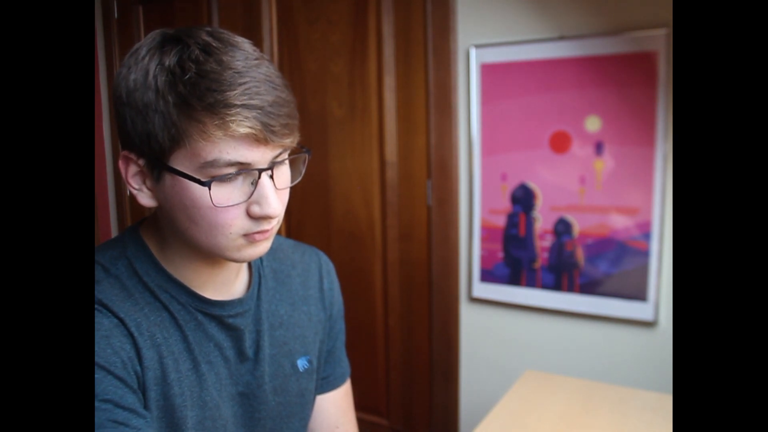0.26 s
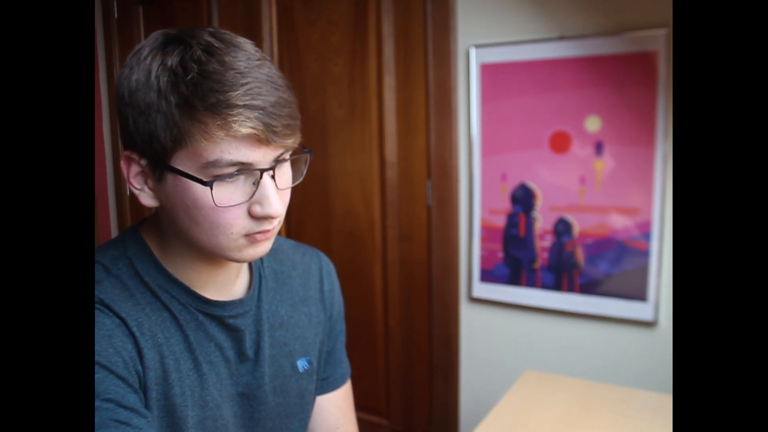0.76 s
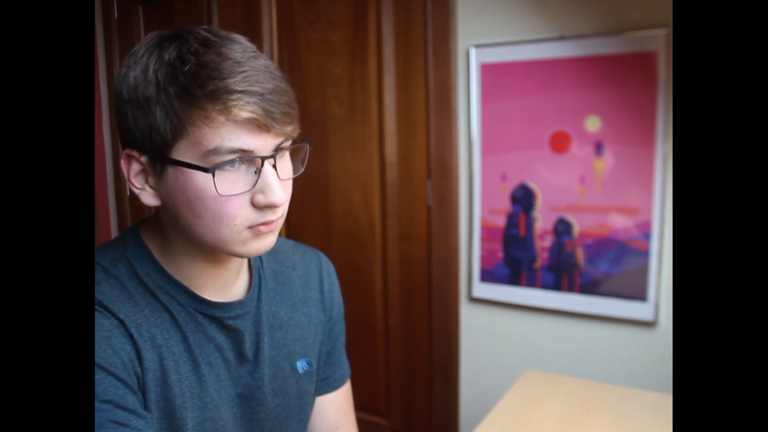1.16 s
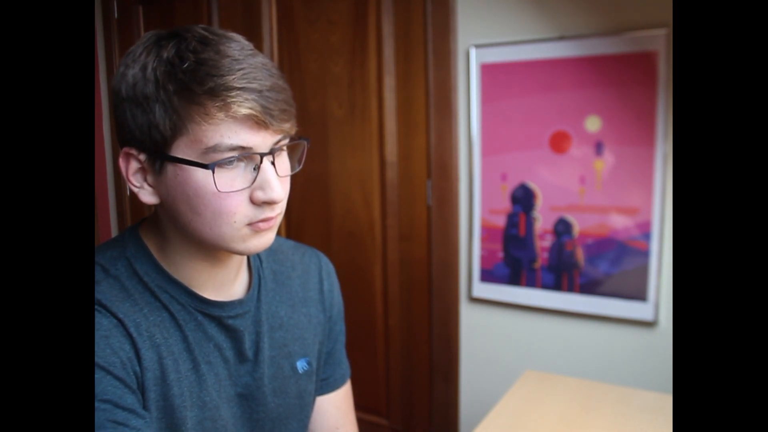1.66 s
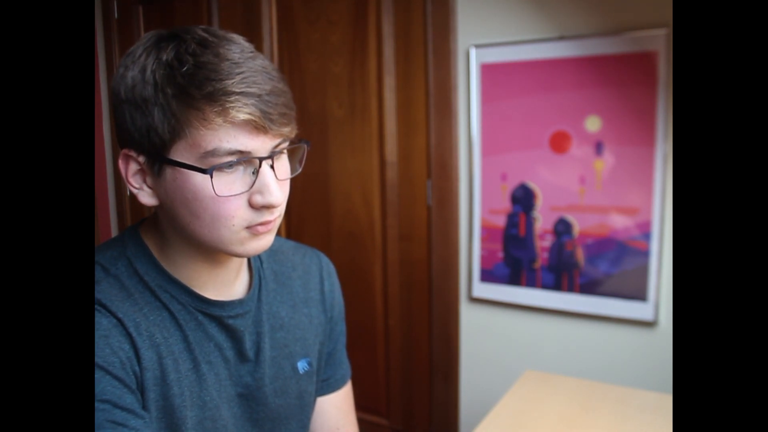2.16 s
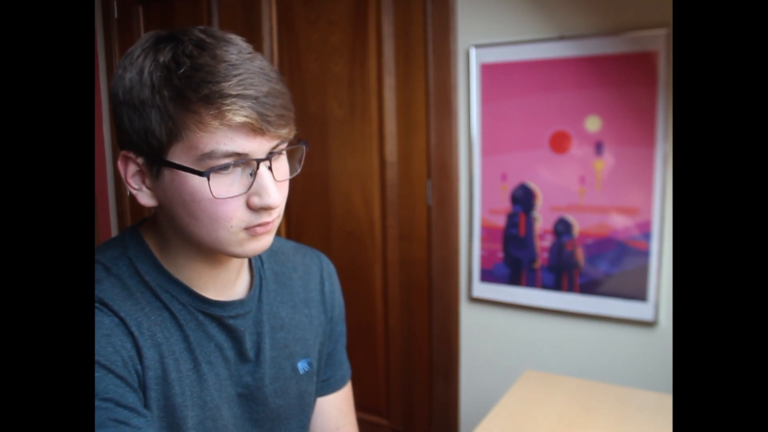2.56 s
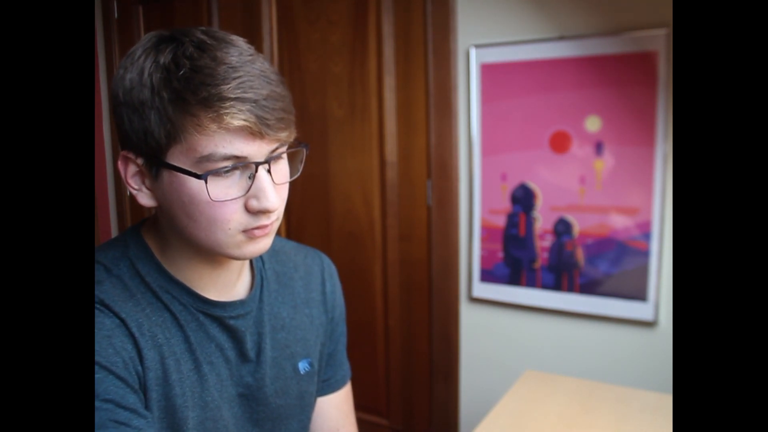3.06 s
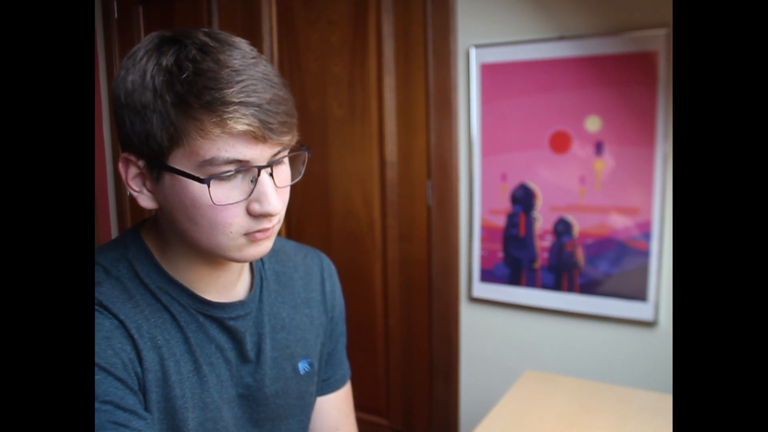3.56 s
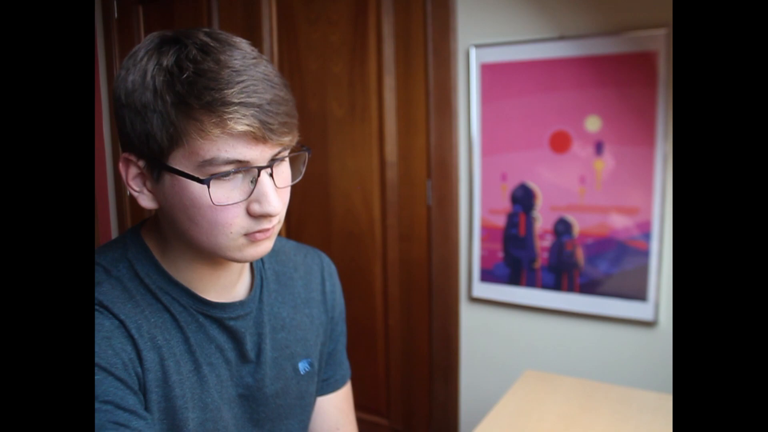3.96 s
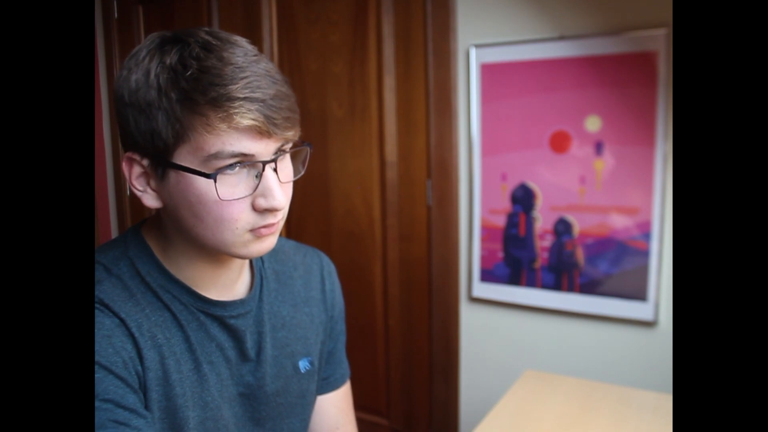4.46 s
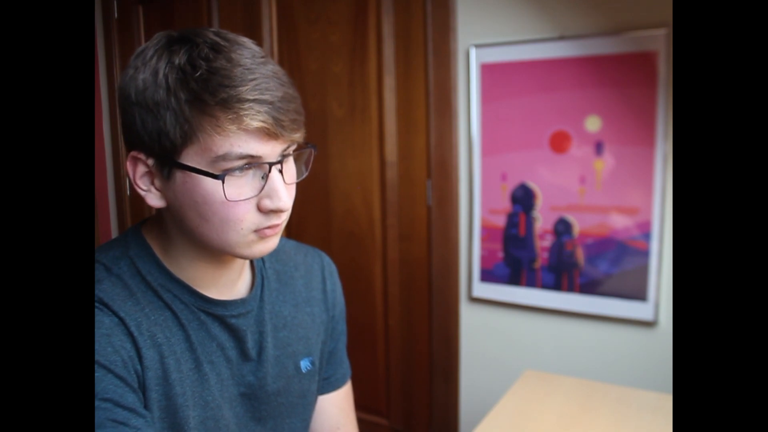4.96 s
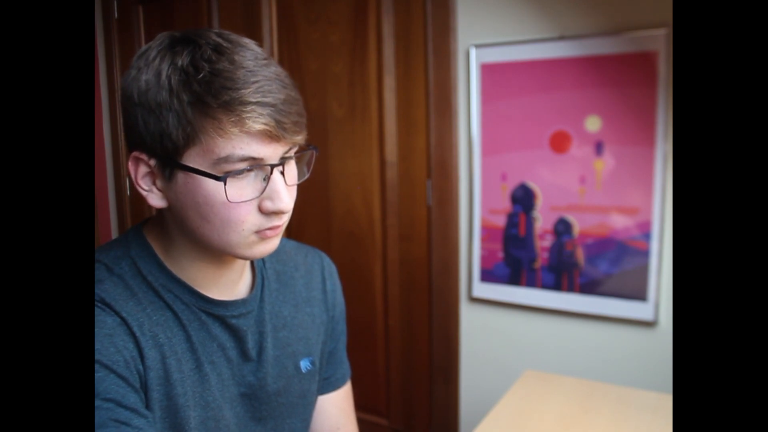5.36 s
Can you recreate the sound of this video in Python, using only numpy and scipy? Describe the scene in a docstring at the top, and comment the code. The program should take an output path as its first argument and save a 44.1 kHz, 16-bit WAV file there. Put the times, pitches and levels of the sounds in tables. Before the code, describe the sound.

In a small, quiet room with faint rumble and hiss, a hand works a computer mouse on a wooden desk. Six sharp, plastic double ticks come at a slow, slightly uneven pace, mixed with very soft sliding. Dull knocks on the desk boom up the microphone stand throughout, the hardest just after the fifth click. Shortly after the last click, the sound cuts off.

```python
"""A computer mouse is clicked six times on a wooden desk in a small, quiet room.
Each press and release snaps the switch, which rings its spring and rattles the plastic shell.
The mouse rubs softly over the desk; hand and mouse bump the wood, whose boom travels up the
microphone stand. Under it lie room rumble, hiss and a thin whine, until the sound is switched off."""
import sys
import numpy as np
from scipy import signal
from scipy.fft import rfft, irfft
from scipy.io import wavfile

SR = 44100
rng = np.random.default_rng(int(sys.argv[2]) if len(sys.argv) > 2 else 0)


def materialize(psi):
    """Save the field psi as 16-bit PCM at rate SR to the path in sys.argv[1].

    A 1-D psi becomes a single channel; in a 2-D psi each row is a channel.
    """
    bounded = np.clip(np.atleast_2d(psi).T, -1, 1)
    quanta = np.round(bounded * 32767).astype(np.int16)
    wavfile.write(sys.argv[1], SR, quanta)


N = 247489
TOP_HZ = 16000  # upper edge of the sound

# Levels are relative. A colour says how strong low and high pitches are. A fade is the time to drop 60 dB.
# colour of the room rumble and hiss: f/Hz, level/dB
BACKGROUND_COLOUR = [(8.8, -37), (15, 1.5), (30, -1.5), (54, -10.5), (112, -12), (134, -13.3), (184, -15),
                     (250, -17.5), (321, -23), (469, -21.5), (726, -30), (891, -30), (1900, -33),
                     (3030, -34), (9190, -37.5), (16000, -41.5)]
# lone steady tones: f/Hz, level/dB
HUM_TONES = [(300, -74.5), (3666, -80.5)]
# strength along the overtones of the electronic whine: f/Hz, level/dB
WHINE_COLOUR = [(1000, -78), (5000, -82), (8000, -90), (11500, -80.5), (15000, -84)]

# hand or mouse bumps the desk: t/s, level/dB, softness/s, frame sway/dB
DESK_BUMPS = [ (.002, -41, .0015, -.5), (.1893, -35.5, .0024, -3), (.8033, -31.5, .0022, -4),
              (1.3138, -29.5, .0014, -1), (1.9797, -42.5, .00066, -10), (2.3745, -28, .0019, -3),
              (2.9024, -29, .0012, 3.5), (3.1466, -32, .0016, -2), (4.3351, -17.5, .000078, -8),
              (4.8377, -35.5, .00015, -5), (5.0107, -30, .0016, -1)]
# a click pushes the desk, then it springs back: delay/s, level change/dB, softness/s, frame sway/dB
PRESS_THUD, RELEASE_THUD = (-.0005, 0, .0014, 3), (.018, -8.5, .0007, 3)
# tones of the frame (microphone stand and whole desk top): f/Hz, level/dB, fade/s
FRAME_TONES = [(66.1, 3.5, 0.34), (40, -3.5, 0.13)]
# tones of the wooden panel before the hand stills it: f/Hz, level/dB, fade/s
PANEL_TONES = [(128.1, 8.5, 0.28), (186.9, 10, 0.24), (205, 4, .05), (312, -5, 0.13), (368, -9.5, 0.064)]

# slides of the mouse over the desk: t/s, length/s, level/dB
SLIDES = [(.27, .28, -64), (.58, .75, -65), (1.35, .5, -63), (2.24, .46, -60.5), (3.62, .4, -66),
          (4.22, .45, -61.5), (5.3, .22, -60)]
# colour of the rubbing mouse feet: f/Hz, level/dB
RUB_COLOUR = [(100, -33.5), (280, -12.5), (430, 4), (560, 0), (700, -3.5), (900, -8), (1300, -13),
              (3000, -22), (16000, -41)]
# light finger taps on the mouse: t/s, level/dB, f/Hz, fade/s
FINGER_TAPS = [(.731, -56, 860, 0.059), (1.4664, -43, 890, 0.028)]

# button presses: finger lands t/s, switch closes t/s, landing/dB, force/dB, extra ring/dB, desk thud/dB
BUTTON_PRESSES = [ (.3080, .3475, -2.5, -4.5, 1.5, -49), (1.4258, 1.4290, 1.5, .3, -1, -30.5),
                  (2.2940, 2.3120, 0, -3, 0, -39), (3.6320, 3.6347, 0, 2.7, 1.5, -31),
                  (4.2580, 4.2644, 0, -.7, 0, -38), (5.0580, 5.0630, 3.5, .3, -3, -36)]
# button releases: switch opens t/s, force/dB, extra ring/dB, factor on the spring's pitch
BUTTON_RELEASES = [(.3730, 0, 2, .985), (1.5077, 0, 1, 1), (2.3449, -.5, 1.5, .985), (3.6979, -2.5, 0, 1),
                   (4.3120, .5, -8, 1.06), (5.1400, -1, -2, 1.03)]
# base levels for each stage of a click: spring/dB, metal tick/dB, shell/dB
LANDING_DB, PRESS_DB, RELEASE_DB = (-62, -60, -49), (-44, -44.5, -54), (-45, -42, -49.5)
# tones of the switch spring: f/Hz, level/dB, fade/s
SPRING_TONES = [(5500, -15, .008), (6410, -12, 0.0072), (6880, -8.5, 0.01), (7366, -1, 0.012),
                (7700, -5.5, 0.01), (8140, -6.5, .008)]
# tones of the metal contact: f/Hz, level/dB, fade/s
CONTACT_TONES = [(10730, -4.5, .006), (11680, -1.5, 0.0068), (13100, -4.5, 0.0055), (14650, -5.5, .007),
                 (15550, -4.5, .007)]
# colour of the bare snap, which has no pitch: f/Hz, level/dB
SNAP_COLOUR = [(3000, -29.5), (7000, 0.5), (11000, -3.5), (16000, -2.5)]
# colour of the rattling plastic shell: f/Hz, level/dB
SHELL_COLOUR = [(200, -6), (700, -4.5), (980, 0), (1330, .5), (1900, -.5), (3000, 1.5), (4500, -2),
                (5600, 1), (9000, -7.5), (16000, -13)]
# tones of the hollow mouse body: f/Hz, level/dB, fade/s
HOLLOW_TONES = [(1254, 0, .025), (1787, -3, .025), (2821, 0, .025), (6400, 5, .015)]

# colour of the room's echo: f/Hz, level/dB
ECHO_COLOUR = [(300, 5.5), (1500, 0), (5000, 1), (7400, 0), (10500, -3), (12000, -10), (16000, -14)]
# how long the echo lasts: f/Hz, fade/s
ECHO_FADE = [(300, 0.45), (2000, 0.24), (7500, 0.24), (15000, 0.25)]


def gain(db):
    """Turns decibels into a factor to multiply a sound by."""
    return 10 ** (np.asarray(db) / 20)


def look_up(table, hz):
    """Reads between the rows of a table, on a scale of musical pitch."""
    row_hz, values = np.transpose(table)
    return np.interp(np.log(hz + 1), np.log(row_hz + 1), values)


def add(mix, start_s, sound):
    """Mixes a sound in at the given time."""
    part = mix[max(round(start_s * SR), 0):][:len(sound)]
    part += sound[:len(part)]


def noise(colour):
    """Steady noise of the given colour, with an average power of 1."""
    shape = gain(look_up(colour, np.fft.rfftfreq(N, 1 / SR)))
    hiss = irfft(rfft(rng.standard_normal(N)) * shape, N)
    return hiss / np.sqrt(np.mean(hiss ** 2))


def background(noise_db=-51.75, tones_db=-1, whine_hz=1000):
    """Room rumble and microphone hiss, with thin, slightly wavering tones from the electronics."""
    t = np.arange(N) / SR
    drift_times = np.linspace(0, t[-1], 120)
    whine = [(hz, look_up(WHINE_COLOUR, hz)) for hz in np.arange(whine_hz, TOP_HZ, whine_hz)]
    tones = 0
    for hz, db in HUM_TONES + whine:
        drift = np.interp(t, drift_times, np.cumsum(.33 * rng.standard_normal(len(drift_times))))
        tones += gain(db) * np.sqrt(2) * np.sin(2 * np.pi * (hz * t + rng.random()) + drift)
    return gain(noise_db) * noise(BACKGROUND_COLOUR) + gain(tones_db) * tones


def ring(tones, t, pitch=1):
    """A struck object rings with fading tones; neighbours start in opposite directions."""
    return sum((-1) ** k * gain(db - 60 * t / fade_s) * np.sin(2 * np.pi * hz * pitch * t)
               for k, (hz, db, fade_s) in enumerate(tones))


def desk_blows(judder_s=4.9, spacing_s=.03):
    """Lists blows to the desk: t/s, level/dB, softness/s, sway/dB, direction (1 push, -1 ease off)."""
    for bump in DESK_BUMPS:
        yield *bump, -1
    for (_, press_s, *_, thud_db), (release_s, *_) in zip(BUTTON_PRESSES, BUTTON_RELEASES):
        yield *np.add(PRESS_THUD, [press_s, thud_db, 0, 0]), 1
        yield *np.add(RELEASE_THUD, [release_s, thud_db, 0, 0]), -1
    for k, slip in enumerate(rng.uniform(-.1, .1, size=3)):  # the mouse judders over the desk
        yield judder_s + (k + slip) * spacing_s, -42, .0004, -2, 1


def desk_booms(settle_s=.066, settled_db=-13):
    """A soft push mostly sways the frame; a hard knock makes the wooden panel ring."""
    out, t = np.zeros(N), np.arange(SR // 2) / SR
    damping = gain(settled_db * (1 - np.exp(-(t / settle_s) ** 4)))  # the settling hand stills the panel
    frame, panel = ring(FRAME_TONES, t), damping * ring(PANEL_TONES, t)
    for start_s, peak_db, softness_s, sway_db, direction in desk_blows():
        force = t ** 3 * np.exp(-t / softness_s)
        boom = signal.fftconvolve(force, gain(sway_db) * frame - panel)[:len(t)]
        add(out, start_s, direction * gain(peak_db) * boom / abs(boom).max())
    return out


def rubs_and_taps(resting_db=-76):
    """The mouse feet rub the desk in slides that swell and fade, and a finger taps the hollow body."""
    speed = np.zeros(N)
    for start_s, length_s, db in SLIDES:
        progress = np.linspace(0, 1, round(length_s * SR))
        add(speed, start_s, gain(db) * np.sin(np.pi * progress ** .7))  # speeds up faster than it slows
    out = np.hypot(speed, gain(resting_db)) * noise(RUB_COLOUR)  # between slides the hand barely creeps
    for start_s, db, hz, fade_s in FINGER_TAPS:
        add(out, start_s, ring([(hz, db, fade_s)], np.arange(SR // 8) / SR))
    return out


def burst(sound):
    """Gives any short sound the same energy: that of 2 ms at power 1."""
    return sound / np.linalg.norm(sound) * np.sqrt(.002 * SR)


def rattle(rise_s, fade_s, colour=((1, 0),), size=4096):
    """A quick flurry of tiny collisions makes a puff of noise in the given colour."""
    t = np.arange(size) / SR
    envelope = (1 - np.exp(-t / rise_s)) * gain(-60 * t / fade_s)
    spectrum = rfft(rng.standard_normal(size) * envelope)
    spectrum /= abs(spectrum)  # make all pitches equally strong before colouring
    spectrum *= gain(look_up(colour, np.fft.rfftfreq(size, 1 / SR)))
    return burst(irfft(spectrum)[:size // 2])


def click_stages():
    """The finger lands, the switch closes, then it opens: t/s, spring/dB, tick/dB, shell/dB, pitch."""
    for land_s, press_s, land_db, force_db, ring_db, _ in BUTTON_PRESSES:
        yield land_s, *np.add(LANDING_DB, land_db), 1
        yield press_s, *(np.add(PRESS_DB, force_db) + [ring_db, 0, 0]), .97  # rings a little flat
    for release_s, force_db, ring_db, pitch in BUTTON_RELEASES:
        yield release_s, *(np.add(RELEASE_DB, force_db) + [ring_db, 0, 0]), pitch


def mouse_clicks(knock_db=-50.5, knock_growth=3.8):
    """The switch snaps and chatters, ringing its spring and contact and rattling the plastic shell."""
    out, t = np.zeros(N), np.arange(2048) / SR
    shell = dict(rise_s=.0004, fade_s=.02, colour=SHELL_COLOUR)
    for start_s, spring_db, tick_db, shell_db, pitch in click_stages():
        chatter = rattle(rise_s=.0004, fade_s=.007)
        spring = burst(signal.fftconvolve(chatter, ring(SPRING_TONES, t, pitch)))
        tick = burst(signal.fftconvolve(chatter, ring(CONTACT_TONES, t)))
        snap = rattle(rise_s=.0006, fade_s=.017, colour=SNAP_COLOUR)
        add(out, start_s, gain(spring_db) * spring + gain(tick_db) * tick)
        add(out, start_s, gain(tick_db - 2) * snap + gain(shell_db) * rattle(**shell))
    # the button hits bottom just after the switch closes; this knock grows much faster than the force
    for _, press_s, _, force_db, *_ in BUTTON_PRESSES:
        knock = rattle(**shell) + gain(-6) * burst(ring(HOLLOW_TONES, t))
        add(out, press_s + .003, gain(knock_db + knock_growth * force_db) * knock)
    return out


def room_echo(sound, bounce_s=.0058, bounce_db=-4, dull_hz=7000, tail_db=2, build_s=.007):
    """One slightly dull bounce off a near surface, then a wash of echoes whose low notes last longest."""
    hz, t, bands = signal.stft(rng.standard_normal(SR // 2), SR, nperseg=256)
    bands *= gain(-60 * t / look_up(ECHO_FADE, hz)[:, None]) * (1 - np.exp(-t / build_s))
    plain = signal.istft(bands, SR, nperseg=256)[1]
    coloured = signal.istft(bands * gain(look_up(ECHO_COLOUR, hz))[:, None], SR, nperseg=256)[1]
    echo = gain(tail_db) * coloured / np.linalg.norm(plain)
    bounce = signal.lfilter(*signal.butter(1, dull_hz, fs=SR), signal.unit_impulse(20))
    add(echo, bounce_s, gain(bounce_db) * bounce)
    return signal.fftconvolve(sound, echo)[:N]


def scene():
    """Clicks and rubbing reach the microphone through the air, bumps through the desk."""
    clicks = mouse_clicks()
    return (clicks + room_echo(clicks) + rubs_and_taps() + desk_booms() + background())[None]


def record(dry):
    """Switches the sound off near the end and removes the very highest treble."""
    off_s = 5.412
    switched_on = np.clip((off_s - np.arange(N) / SR) / .002, 0, 1)
    treble_cut = signal.firwin(401, TOP_HZ, window=("kaiser", 9), fs=SR)
    return signal.oaconvolve(dry * switched_on, treble_cut[None], "same")


dry = scene()
out = record(dry)
materialize(out)
```